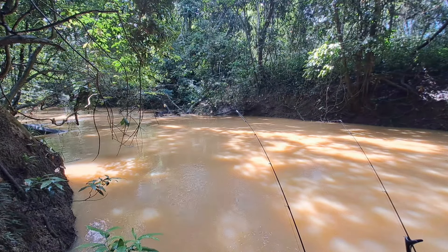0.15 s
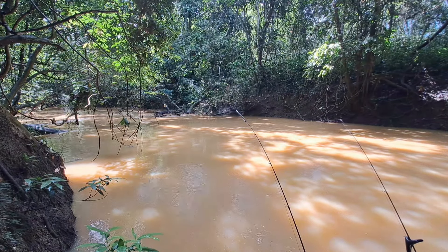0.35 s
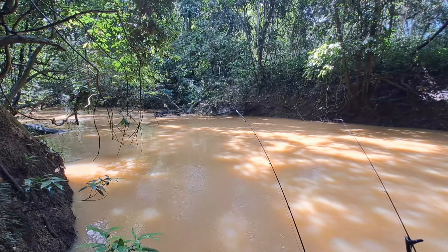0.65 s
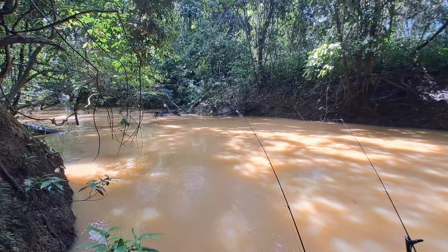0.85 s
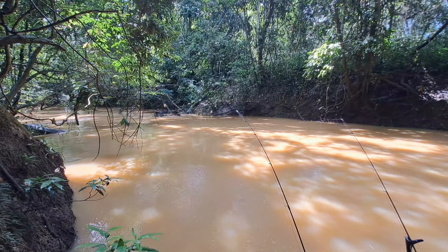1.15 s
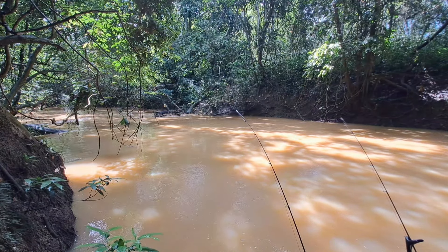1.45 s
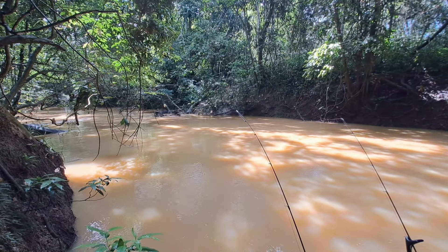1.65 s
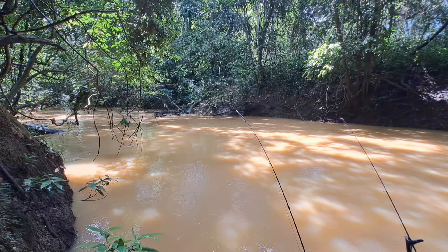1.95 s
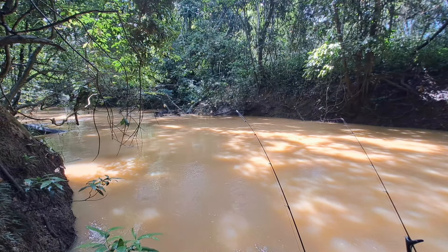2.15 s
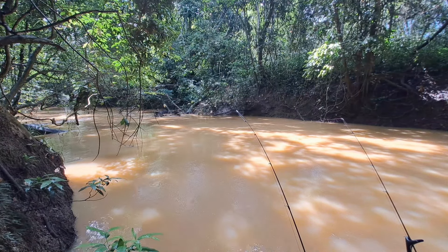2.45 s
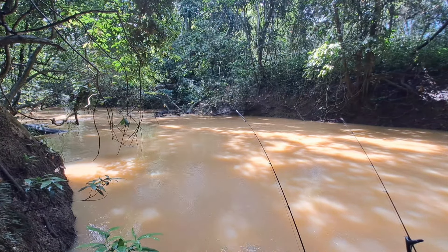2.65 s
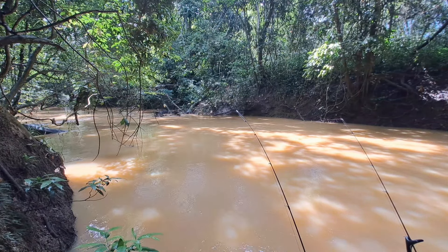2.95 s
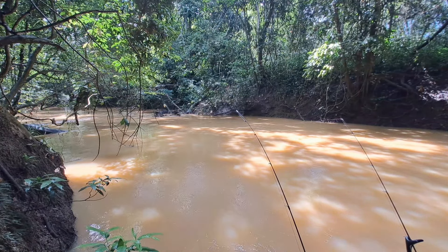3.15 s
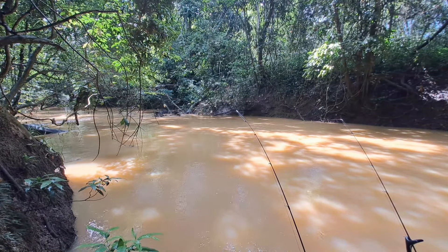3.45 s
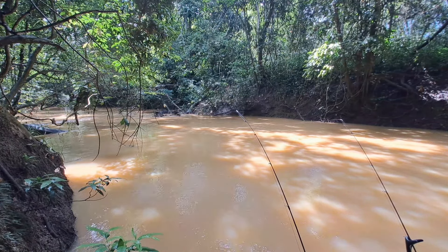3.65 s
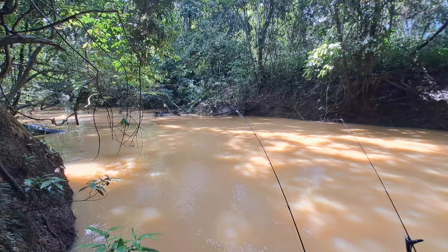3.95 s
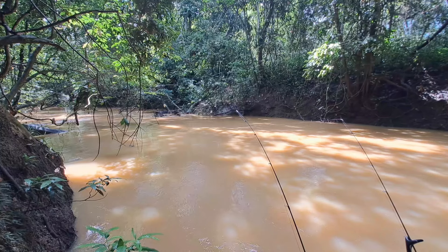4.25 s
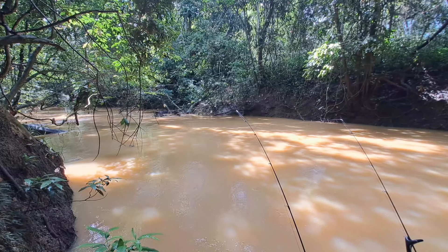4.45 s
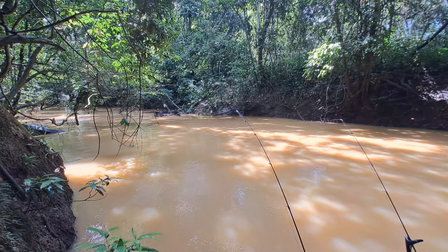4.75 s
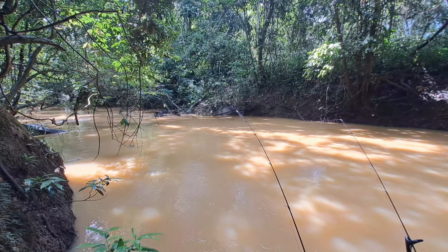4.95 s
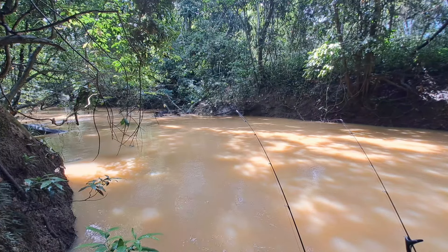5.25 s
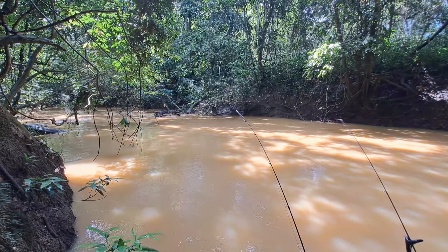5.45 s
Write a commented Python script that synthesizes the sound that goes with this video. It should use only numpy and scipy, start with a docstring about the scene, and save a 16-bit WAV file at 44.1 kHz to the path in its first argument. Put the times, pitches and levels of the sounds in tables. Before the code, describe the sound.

Dense, shrill forest insect chorus with one pulsing cicada whistle, faint leaf rustles, then dull handling knocks, a sharp snap and a short rub.

```python
"""Insects by a slow forest river

In the forest along a muddy river, a near cicada on the right whistles with a fast throb: a gliding tone
swelled twice a throb. Far cicadas buzz and katydids hiss as swarms of noise bursts through resonances;
tree crickets trill thin pulsed tones. Shaped noise makes leaves, scrapes and river; far calls are sliding
tones. Late on, handling next to the microphone rings damped modes: dull knocks, a sharp snap, a short rub.
"""
import sys
import numpy as np
from scipy import signal
from scipy.fft import rfft, irfft
from scipy.io import wavfile
from scipy.ndimage import uniform_filter1d

SR = 44100
rng = np.random.default_rng(int(sys.argv[2]) if len(sys.argv) > 2 else 0)


def store_wav(level_fs):
    """Save 16-bit WAV to argv[1]."""
    pcm = np.round(np.clip(np.atleast_2d(level_fs), -1, 1) * 32767)
    wavfile.write(sys.argv[1], SR, pcm.T.astype(np.int16))


N = 246519
TIME = np.arange(N) / SR
FREQS = np.fft.rfftfreq(N, 1 / SR)

# Near cicada, on the right: its pitch climbs to a steady note as it settles into the song.
WHISTLE_HZ, START_FLAT_HZ, SETTLE_S = 5811, 34, 1.2
# Each swell lasts half a throb and peaks a little past its middle; one starts this far into a throb.
SWELL_SKEW, SWELL_START_THROBS = 1.25, .225
# Timing of the paired swells. Each row: time in seconds, throbs so far.
SWELL_THROBS = [(0, .07), (.8, 9.15), (.95, 11.04), (1.4, 16.03), (1.9, 21.86), (2.8, 31.87), (3.25, 36.91),
                (3.45, 39.32), (4, 45.52), (5, 56.63), (5.59, 63.08)]
# Two swells a throb, uneven, as echoes reinforce and cancel the bending whistle. Each row: time in seconds,
# depth of the gaps (0 to 1), weight towards the turn of the throb (-1 to 1), lean towards the first half
# of the throb (-1 to 1).
THROB_SWELLS = [(0.0, 0.7, -0.13, 0.064), (0.48, 0.74, 0.21, -0.2), (0.64, 0.85, -0.29, 0.69),
                (0.96, 0.78, -0.46, -0.29), (1.2, 0.83, 0.45, 0.16), (1.36, 1, 0.033, -0.41),
                (1.52, 0.8, -0.16, -0.035), (1.76, 0.1, -0.27, -0.32), (1.84, 0.77, 0.16, -0.02),
                (1.92, 0.57, -0.36, -0.14), (2.4, 0.63, 0.026, -0.11), (3.28, 0.7, 0.23, 0.3),
                (3.44, 0.36, 0.29, -0.15), (3.52, 0.75, 0.28, 0.18), (4.4, 0.86, 0.048, -0.11),
                (4.72, 0.68, 0.25, 0.38), (5.12, 0.84, 0.35, -0.079), (5.59, 0.7, 0.46, 0.74)]
# How each throb bends the pitch. Each row: time in seconds, swing in Hz, lead in throbs.
PITCH_BEND = [(0, 17, .43), (.4, 17, .45), (.85, 7, .45), (1.3, 10, .27), (1.8, 12, -.07), (2.4, 14, .02),
              (5.59, 15, .02)]
# Its loudness. Each row: time in seconds, level at the right ear in dB, level at the left ear in dB.
CICADA_LEVEL = [(0.0, -27, -36.5), (0.4, -25, -37.5), (0.64, -26, -38.0), (0.88, -32.5, -43),
                (1.04, -25.5, -37), (1.28, -28, -41.0), (1.52, -27.5, -36), (1.68, -31.5, -36.0),
                (2.4, -26.5, -36.5), (2.64, -26, -33.5), (3.12, -24.5, -33.5), (3.28, -32, -40),
                (3.44, -25.5, -32), (3.68, -25.5, -36), (4.08, -29.5, -38), (4.24, -26, -38),
                (4.8, -27.5, -36), (5.59, -30, -41)]
# Its undertone. Each row: time in seconds, level in dB, lag in throbs.
CICADA_UNDERTONE = [(0, -67, 0.37), (1, -64.5, .25), (1.3, -65, .2), (2, -65.5, 0.23), (2.7, -63.5, 0),
                    (3.1, -60.5, 0), (3.7, -62, 0.032), (5.2, -63, 0)]

# Dull knocks next to the microphone. Each row: start in seconds, level of the push in dB before filtering,
# hardness of the contact in Hz, scuff against the push in dB.
KNOCK_CONTACTS = [(3.7669, -2.5, 2280, -6), (3.826, -13.5, 1090, -5.5), (4.119, -15, 1800, -4),
                  (4.278, -35, 1200, 9), (4.309, -29, 3500, 11), (4.387, -21, 970, 3),
                  (4.3985, -10, 1700, -9), (4.411, -30.5, 5000, 7), (4.454, -20, 1400, 4.5),
                  (4.591, -28, 3500, 3.5)]
# The first, heaviest knock rattles on in scuffing rebounds, each weaker than the last.
RATTLE_GAP_S, RATTLE_DB, RATTLE_LOSS_DB, RATTLE_HZ, RATTLE_SCUFF_DB = .0105, -17, 5.5, 3500, 10.5
# The rub sticks and slips. Each row: start in seconds, level in dB before filtering.
RUB_SLIPS = [(5.211, -16), (5.226, -21.5), (5.244, -12.5), (5.258, -15.5), (5.274, -21), (5.29, -22.5)]
RUB_HZ, RUB_SCUFF_DB = 393, -3
# What the contacts ring. Each row: frequency in Hz, width in Hz, relative level in dB.
KNOCK_MODES = [(258, 59, -5.5), (505, 39, 0.5), (631, 196, 15.5), (1030, 250, 5.5), (1490, 320, 8),
               (1930, 160, -21), (3136, 100, 4.5), (5100, 760, -49)]
# The sharp snap and its small rebounds. Each row: start in seconds, level in dB before the side gain.
SNAP_CLICKS = [(4.4477, -2.5), (4.4625, -21), (4.482, -22)]
# What the snap rings. Each row: frequency in Hz, width in Hz, relative level in dB.
SNAP_RESONANCES = [(2900, 400, 2), (4800, 2200, -5), (8000, 3500, -2), (12000, 4000, -9)]
# A soft rustle under the handling. Each row: time in seconds, level in dB.
STIR_LEVEL = [(3.4, -106), (3.7, -53), (4.55, -43.5), (5.05, -69), (5.45, -50), (5.59, -58.5)]
# The colour of that rustle. Each row: frequency in Hz, relative level in dB.
STIR_SPECTRUM = [(100, -9.5), (350, -6), (750, -1.5), (1400, -6), (2100, -7), (3100, -3), (4500, -9.5),
                 (15000, -5)]
# Brief swishes and ticks. Each row: centre in seconds, length in seconds, pitch in Hz, level in dB.
BRIEF_RUSTLES = [(.56, 0.0095, 10000, -47), (3.78, 0.017, 7660, -36), (3.965, 0.06, 2830, -47.5),
                 (3.96, .043, 10100, -41.5), (4.21, 0.0078, 11100, -39), (4.315, 0.016, 1930, -51.5)]

# Far cicadas, their body resonances. Each row: frequency in Hz, relative level in dB.
BUZZ_SPECTRUM = [(4800, -35), (5250, -23.5), (5500, -11.5), (5900, -1), (6300, -3.5), (6700, 1),
                 (7200, 1.5), (7850, -2.5), (8600, -15.5), (8950, -5), (9500, -17), (10600, -24),
                 (12000, -10.5), (15000, -42)]
# The buzz leans right; the left microphone is dull around 9 to 11 kHz. Each row: frequency in Hz,
# left minus right in dB.
BUZZ_EAR_BALANCE = [(5500, -0.5), (7200, -6.5), (8000, -6.5), (8600, -26), (9000, -35), (9700, -56),
                    (11000, -22)]
# A lower, more distant chorus. Each row: frequency in Hz, relative level in dB.
LOW_SPECTRUM = [(2000, -38.5), (2800, -25), (3050, 2), (3280, 7.5), (3550, 3.5), (3900, -11.5),
                (5000, -18.5), (6500, -8.5)]

# Katydids grow steadily louder and creep up in pitch.
KATYDID_HZ, KATYDID_HZ_PER_S, KATYDID_DB, KATYDID_DB_PER_S = 12764, 22, -40, 1
# Their wing resonance. Each row: offset from the pitch in Hz, relative level in dB.
WING_RESONANCE = [(-2300, -21), (-1600, -40), (-850, -6.5), (-450, -5.5), (-15, 3.5), (463, -4), (1099, -7),
                  (2428, -28), (3207, -36)]
# Where their chorus sits. Each row: time in seconds, left minus right in dB.
KATYDID_PLACE = [(0.0, -7), (2.6, -2.5), (5.59, -4.5)]

# Thin trills of tree crickets. Each row: mean pitch in Hz, mean pulses per second, level in dB,
# left minus right in dB, depth of the pulses (0 to 1).
CRICKET_TRILLS = [(5470, 13, -67, -6, .5), (6032, 31, -53, -8, .5), (8950, 50, -60, -14, .7),
                  (11690, 9, -65, -6, .5), (12895, 2.3, -54, 1, .6)]

# A soft swish early on. Each row: time in seconds, level in dB.
SWISH_LEVEL = [(.4, -91), (.62, -60), (.98, -56.5), (1.25, -67), (1.42, -96)]
# The colour of the swish. Each row: frequency in Hz, relative level in dB.
SWISH_SPECTRUM = [(120, -14), (270, 1.5), (400, -5.5), (950, -4), (1400, -21), (2300, -18), (2750, 4),
                  (3500, -13), (9000, -32)]
# Crackle of leaves. Each row: time in seconds, level in dB.
LEAF_LEVEL = [(.55, -71), (.7, -52), (.85, -59), (1.1, -62), (1.25, -85), (3.1, -67), (3.45, -62.5),
              (3.6, -53), (3.95, -61), (4.8, -53.5), (5.1, -61)]
# Falling scrapes. Each row: centre in seconds, length in seconds, pitch at the centre in Hz,
# glide in octaves per second, level in dB.
FALLING_SCRAPES = [(.49, 0.046, 3660, -3, -52.5), (3.552, 0.026, 4170, -6, -48)]
# Faint far calls. Each row: centre in seconds, length in seconds, pitch at the centre in Hz,
# glide in octaves per second, level in dB.
DISTANT_CALLS = [(0.118, 0.055, 1597, 0.5, -58.5), (0.192, 0.0077, 1700, 5.5, -53.5),
                 (0.223, 0.032, 1616, -2.5, -61), (0.503, 0.032, 550, 6, -61),
                 (0.583, 0.018, 1200, 17, -55), (0.645, 0.066, 1527, 1.5, -59), (1.248, .02, 740, 3, -61.5),
                 (1.504, 0.018, 1640, 5, -57.5), (1.546, 0.028, 1784, -3, -58.5),
                 (1.602, 0.025, 1593, -3, -61.5), (1.979, 0.034, 1580, 0.5, -62.5),
                 (2.3, 0.043, 1087, 2.5, -64), (2.48, 0.034, 1455, 1.5, -66), (2.548, .025, 1655, 3, -66)]
# River and forest air. Each row: frequency in Hz, relative level in dB.
RIVER_SPECTRUM = [(20, -15), (40, -5), (65, 6), (120, -1.5), (250, -4.5), (600, -7), (1200, -9.5),
                  (2200, -15), (5000, -35), (15000, -41)]
TOP_HZ = 15550  # the recorder's upper limit


def undb(db):
    """Decibels to gain."""
    return 10 ** (np.asarray(db) / 20)


def curves(rows):
    """Each column of a table, joined by straight lines in time."""
    s, *columns = np.transpose(rows)
    return [np.interp(TIME, s, c) for c in columns]


def unit(x):
    """Scale to rms 1."""
    return x / np.sqrt(np.mean(np.abs(x) ** 2))


def over_pitch(points):
    """(Hz, value) points joined on a log-frequency axis."""
    hz, value = np.transpose(points)
    return np.interp(np.log(FREQS + 1), np.log(hz), value)


def colour(x, gain):
    """Filter by a gain per frequency; rms 1."""
    return unit(irfft(rfft(x) * gain, N))


def ears(pan_db):
    """Left and right gains of constant total power."""
    gains = undb(np.array([[1], [-1]]) * pan_db / 2)
    return gains / np.sqrt(np.mean(gains ** 2, axis=0))


def walk(rate):
    """Random levels held 1 / rate s and slewed twice, scaled to about rms 1."""
    k = max(int(SR / rate), 1)
    steps = np.repeat(rng.standard_normal(N // k + 1), k)
    slewed = uniform_filter1d(uniform_filter1d(steps, k), k)
    return unit(slewed[:N])


def oscillate(hz):
    """A rotating complex tone that follows a pitch curve."""
    return np.exp(2j * np.pi * np.cumsum(hz) / SR)


def stereo_noise(side):
    """Noise common to both ears, plus a share that differs."""
    mid, diff = rng.standard_normal((2, N))
    return mid + side * diff * np.array([[1], [-1]])


def resonance(hz, width):
    """Response of one damped mode, gain 1 at its centre."""
    return 1j * FREQS * width / (hz ** 2 - FREQS ** 2 + 1j * FREQS * width)


def trees(x, spread_s, count):
    """Echoes off trunks and banks, different at each ear; rms 1."""
    out = np.zeros((2, N), complex)
    for ear in out:
        lags, sizes = rng.uniform(0, 1, count), rng.standard_normal(count)
        for lag, size in zip(lags, sizes):
            ear += size * np.exp(-2 * lag) * np.roll(x, int(lag * spread_s * SR))
    return np.array([unit(ear) for ear in out])


def swarm(click_hz, sharpness, swell_db, count, size=8):
    """Many insects, each a train of tiny bursts at its own rate; their powers add, scattered by leaves."""
    t = TIME[::size]
    traits = rng.uniform([.7, .3, 0], [1.3, 3, 1], (count, 3))
    pace, swell_hz, start = traits.T[:, :, None]
    effort = np.sin(2 * np.pi * (swell_hz * t + start))
    # each insect clicks faster and louder as its effort swells
    phase = start + np.cumsum(click_hz * pace * (1 + 0.017 * effort), axis=1) * size / SR
    bursts = np.exp(-sharpness * (phase % 1)) * undb(swell_db * effort)
    level = np.repeat(np.linalg.norm(bursts, axis=0), size)[:N]
    return level * rng.standard_normal((2, N))


def near_cicada():
    """A nearly pure whistle whose pitch bends once a throb and whose level swells twice a throb."""
    right_db, left_db = curves(CICADA_LEVEL)
    throbs, = curves(SWELL_THROBS)
    turn = 2 * np.pi * throbs
    bend_hz, lead = curves(PITCH_BEND)
    steady_hz = WHISTLE_HZ - START_FLAT_HZ * np.exp(-TIME / SETTLE_S)
    hz = steady_hz - bend_hz * np.sin(turn + 2 * np.pi * lead) + 2.35 * walk(90)
    flutter = undb(1.47 * walk(70)) * (1 + 0.013 * walk(450))
    heard = cicada_at_ears(flutter * oscillate(hz), throbs)
    level = undb([left_db, right_db])
    return level * heard / heard.std(axis=1, keepdims=True) + cicada_undertone(hz, turn)


def cicada_at_ears(song, throbs, left_depth=0.65, left_echo_db=-1.5, right_echo_db=-24, ear_turn_rad=1.44):
    """Reflections reinforce the bending pitch at each ear in turn: the left swells in the right's gaps."""
    def swell(shift):
        """Two swells a throb, delayed by a shift in throbs."""
        return np.sin(np.pi * (2 * (throbs - SWELL_START_THROBS - shift) % 1) ** SWELL_SKEW)

    turn = 2 * np.pi * throbs
    depth, weight, lean = curves(THROB_SWELLS)
    right = (1 - depth + depth * swell(0)) * (1 + weight * np.cos(turn) + lean * np.sin(turn))
    left = 1 - left_depth * (1 - swell(1 / 4))
    # the echoes build up a diffuse field, out of step with the direct song
    echoes = trees(song * right, spread_s=0.17, count=24)
    direct = np.array([unit(song * left) * np.exp(-1j * ear_turn_rad), unit(song * right)])
    echoes = echoes - direct * np.mean(echoes * direct.conj(), axis=1, keepdims=True)
    diffuse = np.array([unit(e) for e in echoes])
    return (direct + undb([[left_echo_db], [right_echo_db]]) * diffuse).real


def cicada_undertone(hz, turn, wane_db=2.0, echo_db=-7):
    """A tone at four fifths of the pitch that rises and falls once a throb, with echoes."""
    db, lag = curves(CICADA_UNDERTONE)
    swell = (1 - 0.48 * np.sin(turn - 2 * np.pi * lag)) * undb(wane_db * walk(22))
    tone = unit(swell * oscillate(hz * 4 / 5))
    heard = tone + undb(echo_db) * trees(tone, spread_s=0.14, count=12)
    return undb(db) * unit(heard.real)


def handling(crackle_db=2.0):
    """Knocks, a rub and a snap at the microphone, with light rustles of grainy noise."""
    grains = stereo_noise(side=0.83) * undb(crackle_db * walk(250))
    stir_db, = curves(STIR_LEVEL)
    started = TIME > STIR_LEVEL[0][0]
    stir = undb(stir_db) * started * colour(grains, undb(over_pitch(STIR_SPECTRUM)))
    return knocks() + snap() + stir + brief_rustles(grains)


def knocks(scuff_s=0.014, graze_s=0.0094, lag_s=0.00028, low_cut_hz=160):
    """Each contact grazes, pushes once and scuffs; softer contacts push for longer."""
    push = SR // 100  # samples of grazing before the push
    drive, t = np.zeros(N), TIME[:SR // 10] - push / SR
    envelope = np.exp(-np.maximum(t / scuff_s, -t / graze_s))
    for s, db, hard_hz, scuff_db in KNOCK_CONTACTS + rattle(count=4) + rub():
        scuff = rng.standard_normal(len(t)) * undb(9.3 * rng.standard_normal(len(t))) * envelope
        blow = np.arange(len(t)) == push
        contact = blow + undb(scuff_db) * scuff / np.linalg.norm(scuff)
        start = int(s * SR) - push
        softened = signal.lfilter(*signal.butter(1, hard_hz, fs=SR), contact)
        drive[start:start + len(t)] += undb(db) * softened
    drive = signal.lfilter(*signal.butter(2, low_cut_hz, "highpass", fs=SR), drive)
    return ring(drive, KNOCK_MODES, lag_s)


def rattle(count):
    """Evenly spaced, weakening rebounds after the heaviest knock: rows like those of KNOCK_CONTACTS."""
    first_s = KNOCK_CONTACTS[0][0]
    return [(first_s + (k + 1) * RATTLE_GAP_S, RATTLE_DB - k * RATTLE_LOSS_DB, RATTLE_HZ, RATTLE_SCUFF_DB)
            for k in range(count)]


def rub():
    """The soft slips of one short rub: rows like those of KNOCK_CONTACTS."""
    return [(s, db, RUB_HZ, RUB_SCUFF_DB) for s, db in RUB_SLIPS]


def snap(tail_db=-24, tail_s=.004, left_db=-3, lag_s=.00034):
    """Hard, bright clicks on the right, each with a short crackling tail."""
    drive = np.zeros((2, N))
    for s, db in SNAP_CLICKS:
        drive += undb(db + tail_db) * fade(s, tail_s) * rng.standard_normal((2, N))
        drive[:, int(s * SR)] += undb(db)
    return undb([[left_db], [0]]) * ring(drive, SNAP_RESONANCES, lag_s)


def fade(s, decay_s):
    """A sudden start and an exponential decay."""
    return (TIME >= s) * np.exp(-np.abs(TIME - s) / decay_s)


def ring(drive, modes, lag_s):
    """A drive rings damped modes (a unit blow peaks at 1); the left ear hears it a moment later."""
    response = sum(undb(db) * resonance(hz, width) for hz, width, db in modes)
    spectrum = rfft(drive) * response / np.abs(irfft(response, N)).max()
    delay = np.exp(-2j * np.pi * FREQS * np.array([[lag_s], [0]]))
    return irfft(spectrum * delay, N)


def brief_rustles(grains, spread=.25):
    """Soft swells of grainy noise, each in a band around its own pitch."""
    out = np.zeros((2, N))
    for s, length, hz, db in BRIEF_RUSTLES:
        near = np.abs(TIME - s) < 2 * length
        edges = np.minimum(hz * np.exp([-spread, spread]), [.4 * SR, .45 * SR])
        band_pass = signal.butter(2, edges, "bandpass", fs=SR, output="sos")
        band = signal.sosfilt(band_pass, grains[:, near])
        swell = np.exp(-2 * ((TIME[near] - s) / length) ** 2)
        out[:, near] += undb(db) * swell * unit(band)
    return out


def far_cicadas(buzz_db=-33.5, low_db=-53.5, low_db_per_s=1.1):
    """Two choruses of tymbal clicks ringing the insects' bodies; the lower one slowly grows."""
    high_clicks = swarm(click_hz=220, sharpness=1, swell_db=1.2, count=12)
    low_clicks = swarm(click_hz=110, sharpness=1.5, swell_db=2.5, count=5)
    buzz = colour(high_clicks, undb(over_pitch(BUZZ_SPECTRUM)) * ears(over_pitch(BUZZ_EAR_BALANCE)))
    low = colour(low_clicks, undb(over_pitch(LOW_SPECTRUM)))
    return undb(buzz_db) * buzz + undb(low_db + low_db_per_s * TIME) * low


def katydids():
    """Wing files rasp a high resonance that creeps up in pitch as the chorus grows."""
    pitch = KATYDID_HZ + KATYDID_HZ_PER_S * TIME
    db = KATYDID_DB + KATYDID_DB_PER_S * TIME
    pan_db, = curves(KATYDID_PLACE)
    offset, level_db = np.transpose(WING_RESONANCE)
    centre = pitch.mean()
    wing_db = np.interp(FREQS - centre, offset, level_db, left=-90, right=-90)
    rasp = colour(swarm(click_hz=46.2, sharpness=0.51, swell_db=2.0, count=7), undb(wing_db))
    # the whole band is shifted along the rising pitch
    glide = oscillate(pitch - centre)
    return (signal.hilbert(rasp) * glide).real * undb(db) * ears(pan_db)


def crickets(waver_hz=9, wane_db=4.3, echo_db=-6):
    """Thin pulsed tones that wax and wane, blurred by the trees."""
    out = 0
    for hz, rate, db, pan_db, depth in CRICKET_TRILLS:
        effort = walk(3.84)
        beat = 2 * np.pi * np.cumsum(rate * (1 + 0.0343 * effort)) / SR
        pulses = undb(wane_db * effort) * (1 + depth * np.cos(beat))
        tone = unit(pulses * oscillate(hz + waver_hz * walk(50)))
        heard = tone + undb(echo_db) * trees(tone, spread_s=0.11, count=6)
        out = out + undb(db) * ears(pan_db) * unit(heard.real)
    return out


def rustling(crackle_db=4, leaf_hz=4400, leaf_width_hz=2200):
    """A soft swish and the fine crackle of leaves, both noise of uneven level."""
    swish_noise = stereo_noise(side=0.7) * undb(3.1 * walk(59.7))
    swish = colour(swish_noise, undb(over_pitch(SWISH_SPECTRUM)))
    leaf_noise = stereo_noise(side=1.0) * undb(crackle_db * walk(400))
    leaves = colour(leaf_noise, resonance(leaf_hz, leaf_width_hz) ** 2)
    return undb(curves(SWISH_LEVEL)[0]) * swish + undb(curves(LEAF_LEVEL)[0]) * leaves


def scrapes(width_hz=330, grain_db=3):
    """Narrow, grainy scrapes that slide down in pitch."""
    out = 0
    for s, length, hz, glide, db in FALLING_SCRAPES:
        since = np.clip(TIME - s, -3 * length, 3 * length)
        grains = stereo_noise(side=0.88) * undb(grain_db * walk(300))
        rasp = colour(grains, resonance(hz, width_hz) ** 2)
        slide = oscillate(hz * (2 ** (glide * since) - 1))
        swell = np.exp(-2 * (since / length) ** 2)
        out = out + undb(db) * swell * (signal.hilbert(rasp) * slide).real
    return out


def far_calls(waver=0.062, echo_db=-4):
    """Short sliding notes, half lost in their echoes."""
    out = 0
    for s, length, hz, glide, db in DISTANT_CALLS:
        since = np.clip(TIME - s, -3 * length, 3 * length)
        pitch = hz * 2 ** (glide * since) * (1 + waver * walk(250))
        swell = np.exp(-2 * (since / length) ** 2)
        out = out + undb(db) * swell * oscillate(pitch).imag
    return out + undb(echo_db) * out.std() * trees(out, spread_s=.09, count=16).real


def river(flow_db=-69.0):
    """A soft wash of slow water: coloured noise with a gently drifting level."""
    wash = colour(stereo_noise(side=0.67), undb(over_pitch(RIVER_SPECTRUM)))
    return undb(flow_db + .5 * walk(3.64)) * wash


def scene():
    """Insects all around, the river below, handling close by."""
    insects = near_cicada() + far_cicadas() + katydids() + crickets()
    return insects + handling() + rustling() + scrapes() + far_calls() + river()


def record(dry):
    """The recorder cuts the top."""
    return signal.sosfilt(signal.ellip(10, .2, 80, TOP_HZ, fs=SR, output="sos"), dry)


dry = scene()
out = record(dry)
store_wav(out)
```